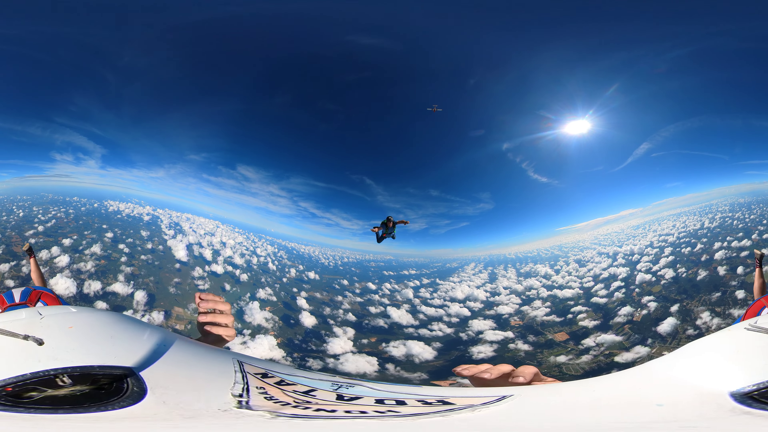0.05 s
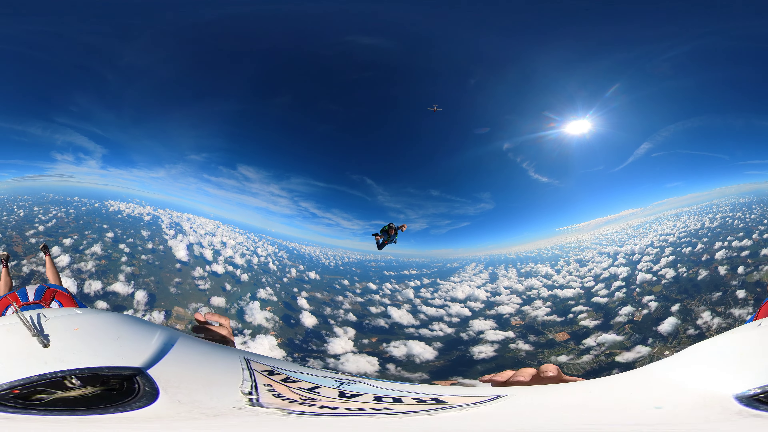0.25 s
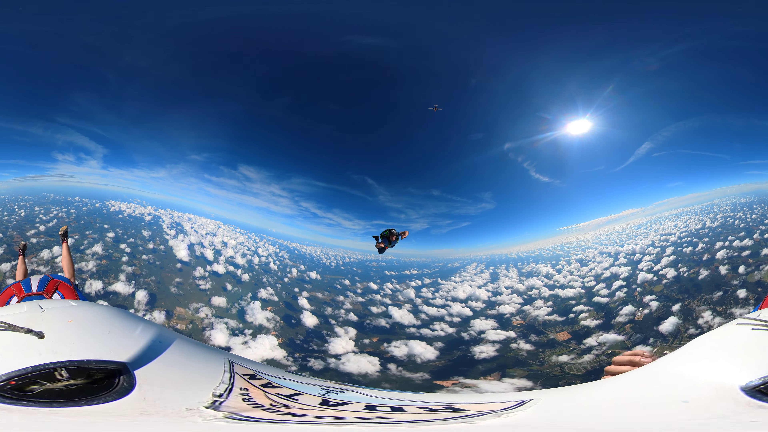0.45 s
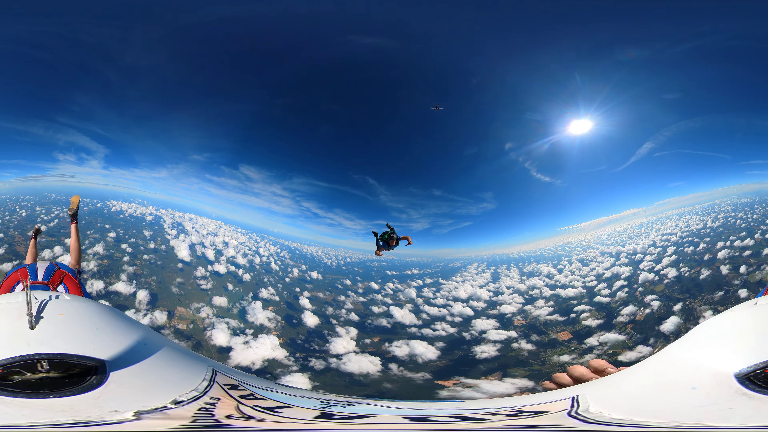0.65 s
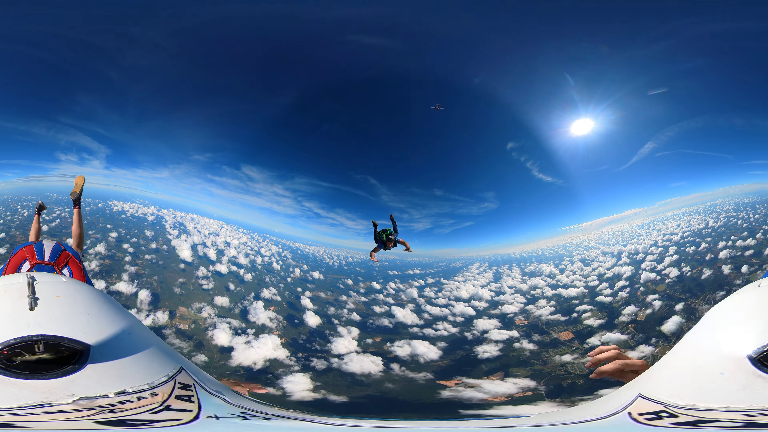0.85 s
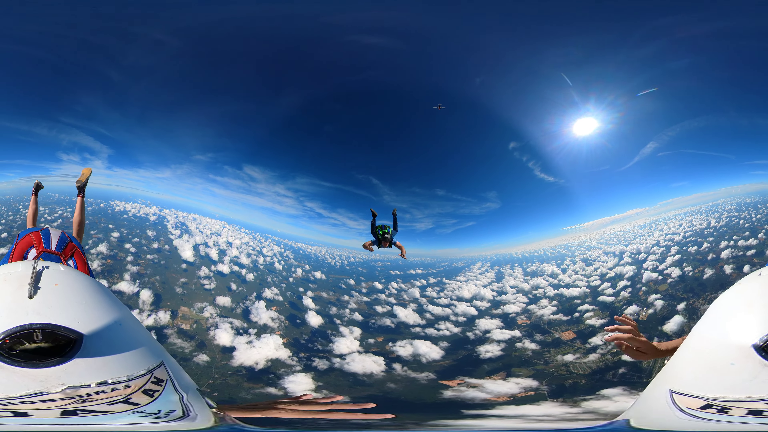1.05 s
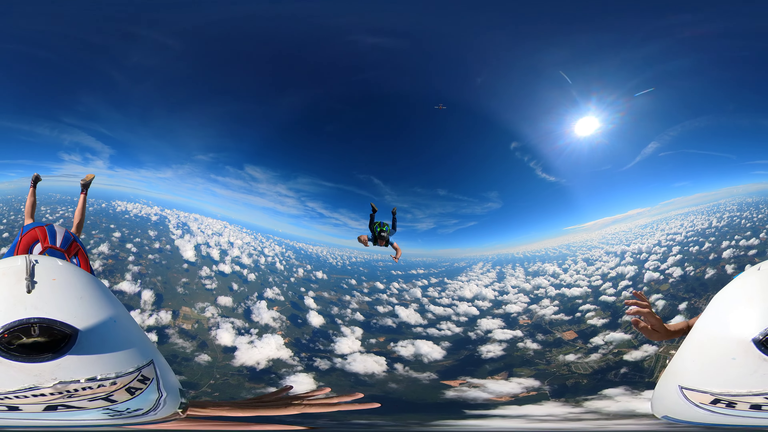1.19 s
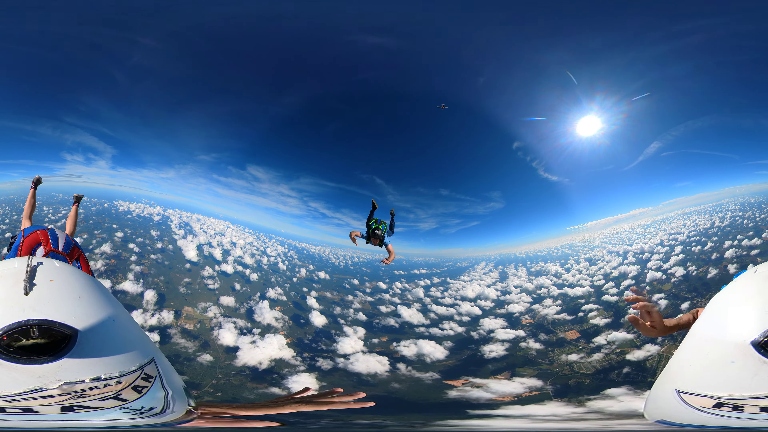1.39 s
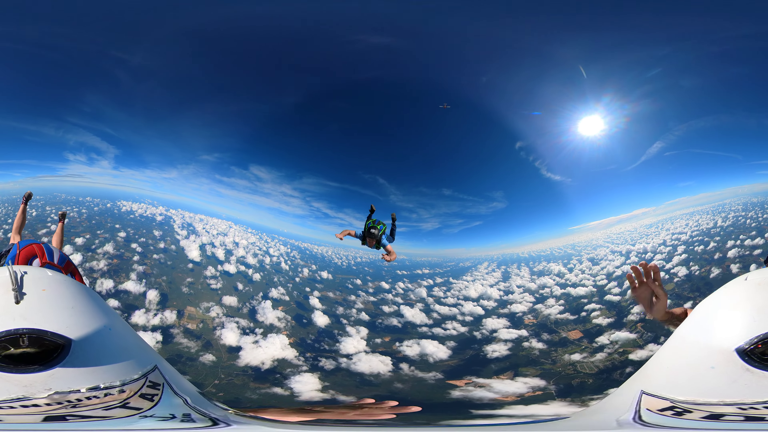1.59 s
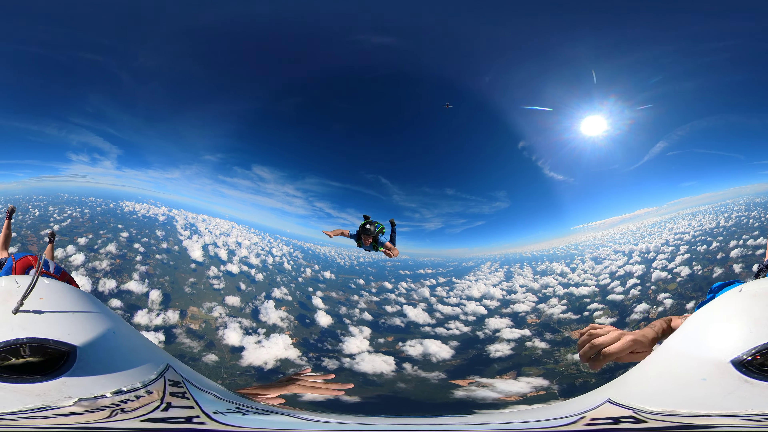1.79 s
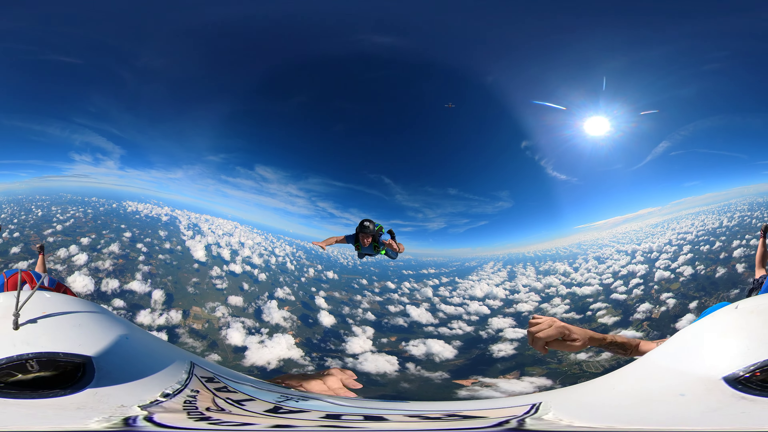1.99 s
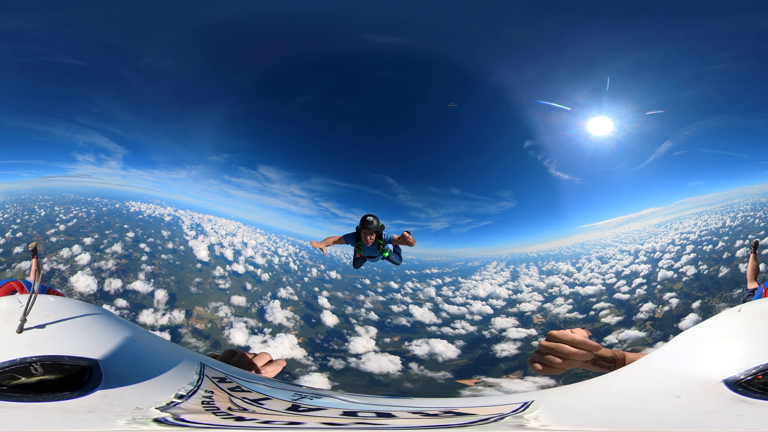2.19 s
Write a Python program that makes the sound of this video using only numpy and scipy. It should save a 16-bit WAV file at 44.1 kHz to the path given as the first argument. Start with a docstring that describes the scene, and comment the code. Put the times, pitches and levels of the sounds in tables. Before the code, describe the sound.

A deep, hollow roar of wind beats directly on a skydiver's microphone high above the clouds. It flutters and sputters with small thumps of air, dips for a moment halfway through, and comes back just as rough.

```python
"""High in the open air, in freefall, wind roars over a small camera microphone.
Eddies (little swirls of air) beat on its opening. Slow buffets (shoves of air) push its diaphragm,
the thin skin that senses sound, to its limit, which chops the roar into a sputter.
Single swirls slap the opening, and a faint crackle sits on top.
Around one second the flow turns smooth, drops into a short lull and surges back."""
import sys
import numpy as np
from scipy import signal
from scipy.fft import rfft, irfft, next_fast_len
from scipy.io import wavfile
from scipy.ndimage import uniform_filter1d

SR = 44100
rng = np.random.default_rng(int(sys.argv[2]) if len(sys.argv) > 2 else 0)


def store_wav(level_fs):
    """Save 16-bit WAV to argv[1]."""
    pcm = np.round(np.clip(np.atleast_2d(level_fs), -1, 1) * 32767)
    wavfile.write(sys.argv[1], SR, pcm.T.astype(np.int16))


N = 98695

# Tone of the crackle: (frequency [Hz], relative level [dB])
CRACKLE_TONE = [(1500, -12), (3200, -2), (5300, 3), (7500, -5), (11000, -10.5), (16000, -19)]
# Sharper spits of crackle: (time [s], level [dB])
SPITS = [(0.407, -76.5), (.57, -77.5), (.717, -81), (1.188, -70), (1.297, -76), (1.38, -76), (1.612, -74.5),
         (1.706, -74.5), (1.987, -77.5), (2.146, -79.5)]
# Single swirls that slap the opening: (time [s], relative level [dB], rough pitch [Hz])
SLAPS = [(.329, -10, 350), (0.426, -12.5, 450), (0.514, -5, 130), (0.628, -15, 300), (.646, -20, 400),
         (.673, -14.5, 350), (0.691, -14, 450), (0.721, -13, 918), (1.349, -9.5, 220), (1.38, -9.5, 200),
         (1.436, -5, 170), (1.484, -14.5, 1206), (1.942, -5, 201.3), (2.118, -12.5, 400), (2.179, -6, 270)]
# How the opening and its cover shape the sound: (frequency [Hz], gain [dB])
OPENING_TONE = [(20, -22), (35, -13), (60, -3.5), (130, -2), (250, -1.5), (500, 0.5), (800, 0), (1300, -6),
                (2000, -8.5), (2500, -16), (2800, -23), (3150, -35), (3600, -42.5), (8000, -72.5)]
# Tone of the eddies: (frequency [Hz], relative level [dB])
EDDY_TONE = [(30, -0.5), (120, 4), (250, 3), (400, -2.5), (650, -8), (1000, -17.5), (1900, -30.5),
             (3000, -37)]
# How hard the buffets push, compared with the diaphragm's limit: (time [s], level [dB])
BUFFET_STRENGTH = [(0, -7.5), (.48, -6), (.6, -0.5), (.75, 2), (.8, -8.5), (.95, -6.5), (1.0, -16.5),
                   (1.28, -8), (1.36, -1.5), (1.5, -2.5), (1.68, -2), (1.75, -8), (1.92, -4), (2.03, -6),
                   (2.12, -1), (2.24, -5)]
# Big buffets that pin the diaphragm and choke the roar: (time [s], half length [s])
CHOKES = [(0.243, 0.0045), (0.335, 0.0042), (0.536, 0.0058), (0.614, 0.0077), (0.634, 0.0056),
          (0.657, 0.0058), (.68, 0.0064), (0.723, 0.012), (0.754, 0.0096), (1.37, 0.0062), (1.411, 0.0056),
          (1.446, 0.005), (1.495, 0.005), (1.523, 0.0053), (1.674, 0.017), (1.954, 0.016), (2.102, 0.0057),
          (2.111, 0.013), (2.22, 0.0064)]
# Flaps, short bursts of rougher air; negative ones dip the level: (time [s], gain [dB])
FLAPS = [(0.101, 2), (0.119, 6.5), (0.224, 5.5), (.288, 5), (0.436, 9), (0.484, 3), (.497, 2.5),
         (0.572, 4.5), (0.6, -8), (0.625, -4), (.646, 11), (0.673, 7.5), (.689, 5), (0.72, 9.5),
         (0.743, -7), (.785, 6), (0.949, 11.5), (1.026, 7.5), (1.43, -6), (1.484, 2), (1.514, -3),
         (1.535, 3.5), (1.586, 1.5), (1.692, -7), (1.748, -0.5), (1.761, 7.5), (1.802, 4.5), (1.841, 4.5),
         (1.886, -7), (1.922, -8), (2.084, 2), (2.12, -1), (2.158, 2), (2.228, -4.5)]
# Where the roar rings with a hollow sound: (time [s], pitch [Hz])
HOLLOW_PITCH = [(0.0, 209), (.15, 282), (.31, 222), (.44, 280), (.52, 188), (.62, 298), (.87, 240),
                (1.0, 320), (1.15, 300), (1.25, 270), (1.44, 200), (1.55, 280), (1.78, 300), (1.9, 260),
                (2.05, 337.5), (2.24, 270)]
# The roar's bass, before its trim: (time [s], level [dB])
BASS_LEVEL = [(0.0, -42), (.18, -27), (.35, -32.5), (.5, -34), (.57, -31.5), (.66, -26.5), (.8, -29),
              (.86, -34.5), (.91, -26.5), (1.01, -29.5), (1.1, -42.5), (1.2, -24), (1.32, -31.5),
              (1.39, -30.5), (1.5, -40), (1.64, -33.5), (1.75, -35), (1.84, -33.5), (1.95, -30),
              (2.05, -34), (2.15, -25), (2.24, -29)]
# Its other bands, before their trims: (time [s], hollow level [dB], middle level [dB], treble level [dB])
UPPER_LEVELS = [(0.0, -17, -52, -35.5), (0.108, -29.5, -21, -40), (0.159, -19, -38.5, -37),
                (0.22, -31.5, -25, -37), (0.25, -31, -32, -36.5), (0.292, -20.5, -28.5, -37.5),
                (0.35, -22.5, -39, -40), (0.406, -21.5, -36, -40), (0.436, -19.5, -30.5, -36),
                (0.465, -22, -31.5, -43), (0.51, -23, -29.5, -46.5), (0.54, -31.5, -45, -42.5),
                (0.58, -28.5, -29.5, -39.5), (0.65, -35, -32.5, -36.5), (0.71, -28.5, -27, -37),
                (0.755, -22, -33.5, -38), (0.79, -23.5, -24, -39), (0.869, -27, -34.5, -39.5),
                (0.931, -33.5, -23.5, -34), (0.971, -21, -33.5, -51.5), (1.01, -24.5, -21, -40),
                (1.06, -29.5, -46.5, -60), (1.111, -32.5, -48.5, -52), (1.16, -19.5, -29.0, -56),
                (1.2, -19.5, -26, -35), (1.27, -21, -23.5, -40), (1.321, -25, -35.5, -46.5),
                (1.398, -24.5, -45, -46), (1.429, -24, -34, -43), (1.46, -23.5, -43.5, -47.5),
                (1.54, -23, -36.5, -45), (1.579, -21, -31.5, -42.5), (1.67, -23, -37.5, -49.5),
                (1.749, -21, -32, -39.5), (1.86, -21.5, -34, -42), (1.93, -19.5, -34, -44),
                (1.969, -31, -36.5, -50.0), (2.029, -18, -29.5, -44.5), (2.111, -31.5, -30, -42.5),
                (2.16, -25, -32.5, -45.5), (2.24, -25.5, -28.5, -39.5)]

FLAP_HALF_S = 0.0105


def from_db(db):
    """Turn decibels into a number to multiply by."""
    return 10 ** (np.asarray(db) / 20)


def unit_power(x):
    """Scale a sound so its average power is one."""
    return x / np.sqrt(np.mean(x ** 2) + 1e-20)


def curves(rows):
    """Join a table's points with straight lines, one curve per column after the time."""
    times, *columns = np.transpose(rows)
    return [np.interp(np.arange(N) / SR, times, column) for column in columns]


def humps(rows):
    """Smooth swells from rows of (time [s], half length [s], height)."""
    t = np.arange(N) / SR
    return sum(height * np.cos(np.pi / 2 * np.clip((t - time) / half, -1, 1)) ** 2
               for time, half, height in rows)


def keep_side(x, hz, side, order):
    """Keep the "low" or "high" side of a frequency; a higher order cuts more steeply."""
    return signal.sosfilt(signal.butter(order, hz, side, fs=SR, output="sos"), x)


def split(x, hz):
    """Split a sound into a low and a high part that add back up to it."""
    low = signal.sosfiltfilt(signal.butter(2, hz, fs=SR, output="sos"), x)
    return low, x - low


def wobble(top_hz, order):
    """A random wiggle, mostly slower than top_hz."""
    return unit_power(keep_side(rng.standard_normal(N), top_hz, "low", order))


def shape_tone(x, tone):
    """Filter a sound to follow rows of (frequency [Hz], gain [dB])."""
    size = 2 * next_fast_len(N)
    hz, db = np.transpose(tone)
    grid_hz = np.maximum(np.fft.rfftfreq(size, 1 / SR), 1)
    gains = from_db(np.interp(np.log(grid_hz), np.log(hz), db))
    # Fold the filter so it rings only after a sound, never before it.
    folded = irfft(np.log(gains))
    folded[1:size // 2] *= 2
    folded[size // 2 + 1:] = 0
    return irfft(rfft(x, size) * np.exp(rfft(folded)))[:N]


def even_out(x, window_s=0.027):
    """Remove slow changes in loudness but leave the fast flutter."""
    size = int(window_s * SR)
    power = uniform_filter1d(uniform_filter1d(x * x, size), size)
    return x / np.sqrt(power + 1e-12)


def crackle(rasp_db=-88, spread_db=8.5, spit_half_s=0.0097):
    """Faint short rasps, louder when the buffets are strong, and a few sharper spits."""
    strength_db, = curves(BUFFET_STRENGTH)
    clumps = np.minimum(wobble(top_hz=92, order=2), 1.8)
    spikes = rng.standard_normal(N) ** 3
    grains = spikes * from_db(spread_db * clumps + strength_db / 2)
    rasp = from_db(rasp_db) * unit_power(shape_tone(grains, CRACKLE_TONE))
    spit_gain = humps((time, spit_half_s, from_db(db)) for time, db in SPITS)
    hiss = unit_power(shape_tone(rng.standard_normal(N), CRACKLE_TONE))
    return rasp + spit_gain * hiss


def slaps(trim_db=-5.5):
    """Each swirl sucks and then pushes once as it passes the opening."""
    t, pressure = np.arange(N) / SR, np.zeros(N)
    for time, db, hz in SLAPS:
        passage = 2 * np.pi * hz * (t - time)
        pressure += from_db(db + trim_db) * passage * np.exp(1 - np.abs(passage))
    return shape_tone(pressure, OPENING_TONE)


def eddies(pressure_db=-1, max_spread_db=4):
    """Little swirls beat fast on the opening, in bursts when the buffets are strong."""
    strength_db, = curves(BUFFET_STRENGTH)
    spread_db = max_spread_db * np.minimum(from_db(strength_db / 2), 1)
    bursts = from_db(spread_db * wobble(top_hz=153, order=2))
    swirls = shape_tone(rng.standard_normal(N), EDDY_TONE)
    return from_db(pressure_db) * unit_power(bursts * swirls)


def buffets(steady_push=0.5):
    """Slow random shoves of air that lean one way and let go during a flap."""
    strength_db, = curves(BUFFET_STRENGTH)
    shoves = from_db(strength_db) * (steady_push + wobble(top_hz=60.4, order=3))
    letting_go = np.minimum(humps((time, FLAP_HALF_S, 1) for time, _ in FLAPS), 1)
    return shoves * (1 - letting_go)


def diaphragm(pressure, vent_hz=132):
    """The diaphragm can only move so far: strong pushes flatten the sound, and the biggest pin it."""
    pinned = np.minimum(humps((time, half, 1) for time, half in CHOKES), 1)
    swing = np.tanh(pressure) * (1 - pinned) + pinned
    vented = keep_side(swing, vent_hz, "high", order=1)  # a vent lets steady pressure leak away
    return shape_tone(vented, OPENING_TONE)


def add_hollow_ring(x, gain_db=-10.5, width_hz=100):
    """Add a broad, hollow ring whose pitch wanders with the flow."""
    hz, = curves(HOLLOW_PITCH)
    spin = np.exp(2j * np.pi * np.cumsum(hz) / SR)
    # Slide that pitch down to zero, keep what lies near it, then slide it back up.
    nearby = keep_side(x / spin, width_hz / 2, "low", order=1)
    return x + from_db(gain_db) * 2 * np.real(spin * nearby)


def wind_roar():
    """Eddies and buffets make a sputtering roar whose four bands swell and sink with the flow."""
    flap_gain = from_db(humps((time, FLAP_HALF_S, db) for time, db in FLAPS))
    sputter = flap_gain * diaphragm(eddies() + buffets())
    bass, rest = split(sputter, hz=86.4)
    hollow, rest = split(rest, hz=418)
    middle, treble = split(rest, hz=1140)
    bands = (bass, add_hollow_ring(hollow), middle, treble)
    levels_db = curves(BASS_LEVEL) + curves(UPPER_LEVELS)  # a list of four curves
    trims_db = (-1, -0.5, -1.5, 2)
    return sum(from_db(level + trim) * even_out(band)
               for band, level, trim in zip(bands, levels_db, trims_db))


def scene():
    """Add the roar, the slaps and the crackle into one channel."""
    return (wind_roar() + slaps() + crackle())[None]


def record(dry):
    """Round the peaks a little and cut the highest treble."""
    rounded = 0.81 * np.tanh(dry / 0.79)
    return keep_side(rounded, hz=16000, side="low", order=12)


dry = scene()
out = record(dry)
store_wav(out)
```